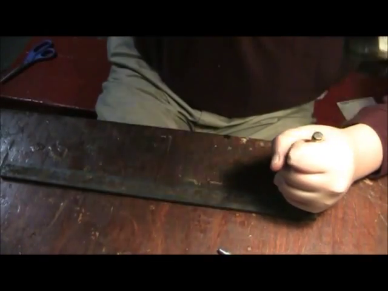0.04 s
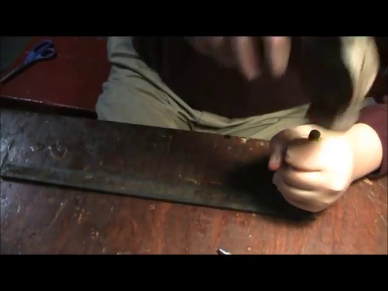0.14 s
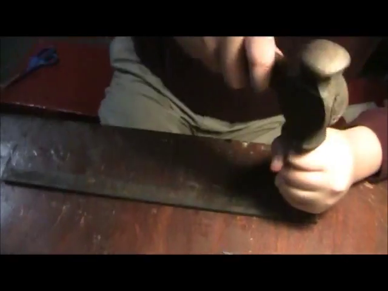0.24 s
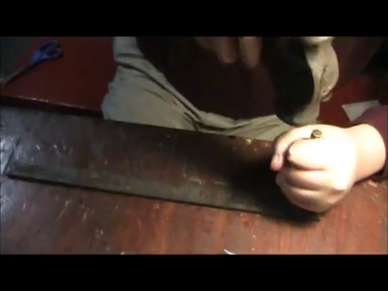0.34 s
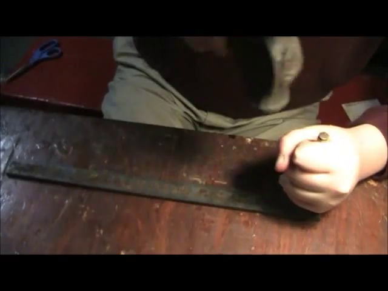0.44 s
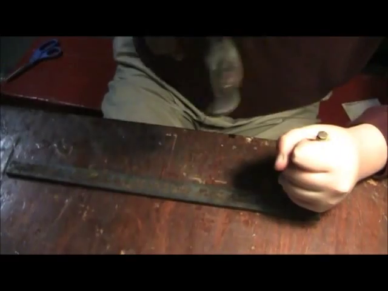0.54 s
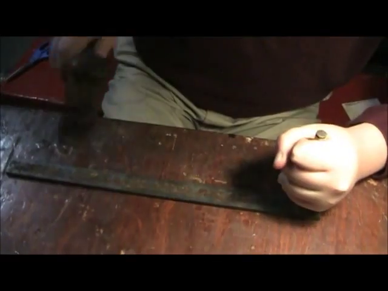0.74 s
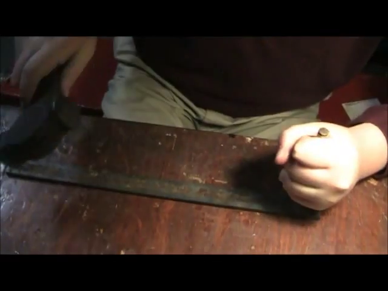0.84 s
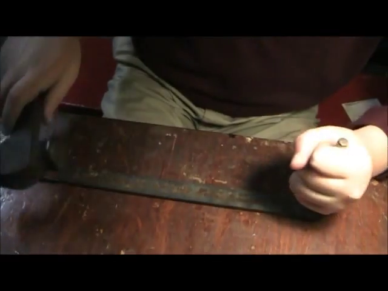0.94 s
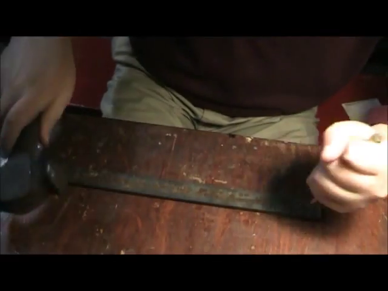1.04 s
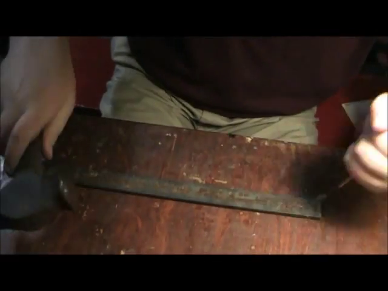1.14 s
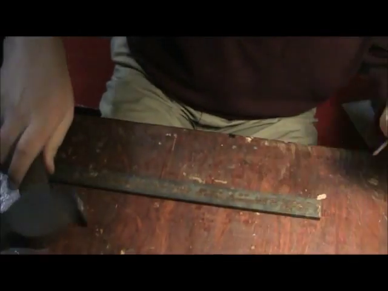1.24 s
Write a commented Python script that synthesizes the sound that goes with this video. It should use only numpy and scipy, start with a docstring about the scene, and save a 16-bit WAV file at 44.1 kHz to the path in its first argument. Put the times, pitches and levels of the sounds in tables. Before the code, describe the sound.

A single hammer blow on a steel punch lands at about 0.2 seconds, a clipped, bright crack with a woody bench thud and short room tail. Loose steel bounces sharply near 0.37 and 0.45, rattles to rest by 0.6, and leaves a high, thin ring fading after 1 second. From 0.7, sleeves and hands rustle, with soft wooden taps around 0.9 to 1.0. Low machine hum continues underneath.

```python
"""A small workshop: one hammer blow on a center punch over a steel bar, heard close, overloading the input.
Noise bursts make the tick, crack and bench shudder; damped sines make the bench thud.
A loose steel piece is tossed up, bounces (short noise chatters), rattles to rest (random grains)
and rings on (beating sines). Behind it: a humming machine (wavering sines), air (shaped noise),
sleeves and hands moving over the wood (patchy noise, small damped notes)."""
import sys
import numpy as np
from scipy import signal
from scipy.fft import rfft, irfft
from scipy.io import wavfile
from scipy.ndimage import uniform_filter1d

SR = 44100
rng = np.random.default_rng(int(sys.argv[2]) if len(sys.argv) > 2 else 0)


def nominal_scale(level):
    """Amplitude ratio for a level in decibels (scalar or array-like)."""
    x = np.asarray(level, float) / 20
    return 10 ** x


def unload_wav(signal):
    """Save mono or channel-first audio to the path in sys.argv[1] as 16-bit WAV at rate SR, clipped to [-1, 1]."""
    wavfile.write(
        sys.argv[1],
        SR,
        np.round(np.clip(np.atleast_2d(signal).T, -1, 1) * 32767).astype(np.int16),
    )


N = 57330  # length in samples


def evened(x):
    """Scales to unit rms."""
    return x / np.sqrt(np.mean(x ** 2) + 1e-20)


def read(points, hz):
    """Reads a spectral table along a log frequency axis."""
    f, value = np.transpose(points)
    return np.interp(np.log(hz + 1), np.log(f + 1), value)


def curve(points, t):
    """Reads a time curve with straight lines between its points."""
    return np.interp(t, *np.transpose(points))


def add(mix, s, sound):
    """Lays a sound into the mix from s seconds on, cut at the end of the mix."""
    part = mix[..., round(s * SR):][..., :sound.shape[-1]]
    part += sound[..., :part.shape[-1]]


def pan(db):
    """Left and right gains; positive dB leans left."""
    return nominal_scale(np.array([[db / 2], [-db / 2]]))


# Stereo width of the noises: f/Hz, left-right likeness (1 = identical)
LIKENESS = [(40, 0.88), (250, 0.96), (1000, 0.79), (3000, 0.45), (8000, 0.33), (15000, .1)]


def alike(a, b):
    """Two channels from two unrelated sounds, mixed as mid and side for the likeness of each band."""
    same = np.clip(read(LIKENESS, np.fft.rfftfreq(a.shape[-1], 1 / SR)), 0, 1)
    mid = rfft(a) * np.sqrt((1 + same) / 2)
    side = rfft(b) * np.sqrt((1 - same) / 2)
    return irfft(np.array([mid + side, mid - side]), a.shape[-1])


def hiss(size=N):
    """White noise in stereo."""
    return alike(*rng.standard_normal((2, size)))


def coloured(x, shape, taps_count=2048):
    """Causal minimum-phase filter of unit energy with the given spectral shape."""
    hz = abs(np.fft.fftfreq(2 * taps_count, 1 / SR))
    log_gain = np.log(nominal_scale(np.maximum(read(shape, hz), -90)))
    response = np.exp(np.conj(signal.hilbert(log_gain)))
    kernel = np.fft.ifft(response).real[:taps_count]
    kernel = kernel / np.linalg.norm(kernel)
    return signal.fftconvolve(x, kernel[None], axes=-1)[:, :x.shape[-1]]


# Decay of the room: f/Hz, t60/s
ROOM_DECAY = [(60, 0.5), (250, 0.87), (1000, 0.56), (3000, 0.53), (7000, 0.37), (14000, 0.076)]


def room(x):
    """Diffuse tail: noise with each band dying at its own speed, faded in over 12 ms."""
    hz, t, z = signal.stft(hiss(SR), SR, nperseg=256)
    decay = nominal_scale(-60 * t / read(ROOM_DECAY, hz)[:, None])
    tail = signal.istft(z * decay, SR, nperseg=256)[1]
    tail = tail * np.clip(np.arange(tail.shape[1]) / SR / 0.012, 0, 1)
    tail = tail / np.linalg.norm(tail[0])
    return signal.fftconvolve(x.mean(0)[None], tail, axes=1)[:, :N]


# Colour of the air noise: f/Hz, relative level/dB per Hz
AIR_COLOUR = [(25, -16), (60, -4.5), (180, -3.5), (400, -5), (700, -11.5), (1500, -17.5), (4000, -24.5),
              (8000, -35), (15400, -40.5)]
AIR_DB = -48


def air():
    """Steady shaped noise."""
    return nominal_scale(AIR_DB) * coloured(hiss(), AIR_COLOUR)


# Lines of the humming machine: f/Hz, level/dB before swell and pan
HUM_LINES = [(59.2, -62), (119, -57), (180, -50.5), (237, -53.5), (296, -57), (425, -53.5), (484.5, -54),
             (545, -53.5), (565.2, -47.5), (646, -56)]
# Slow swell of all the lines together: t/s, level/dB
HUM_SWELL = [(0, -3.5), (.2, -9), (.7, -4), (.95, 1.5), (1.3, -2)]
WAVER_BANDWIDTH_HZ = 3.6  # of each of the two equal poles that smooth the waver


def machine_hum():
    """Steady lines, each wavering in level and phase by its own slow complex noise."""
    t = np.arange(N) / SR
    pole = np.exp(-np.pi * WAVER_BANDWIDTH_HZ / SR)
    hum = np.zeros(N)
    for hz, db in HUM_LINES:
        slow = signal.lfilter([1], [1, -2 * pole, pole * pole], rng.standard_normal((2, 2 * N)))
        waver = evened(slow[:, N:])  # the filter has settled by then
        line = np.exp(2j * np.pi * (hz * t + rng.random()))
        hum += nominal_scale(db) * ((1 + 0.19 * (waver[0] + 1j * waver[1])) * line).real
    return np.sqrt(2) * hum * nominal_scale(curve(HUM_SWELL, t)) * pan(-3.2)


# Colour of the friction: f/Hz, relative level/dB per Hz
RUSTLE_COLOUR = [(100, -33), (300, -3), (700, -3.5), (1100, 1), (1600, -4.5), (3000, -5.5), (5400, -13.5),
                 (8000, -16.5), (15400, -32)]
# Movement: t/s, level/dB before treble lift and patches
RUSTLE_LEVEL = [(.3, -76), (.6, -72), (.72, -47), (.85, -47.5), (.93, -45.5), (1.05, -49), (1.15, -53),
                (1.3, -53)]
# Treble lift, none below 2.5 kHz and full from 10 kHz: t/s, level/dB
RUSTLE_TREBLE = [(.3, -2), (.7, -15), (.85, -1.5), (1., -0.5), (1.12, -1), (1.3, 12.5)]


def rustle():
    """Patchy friction noise of sleeves and hands, with level and treble moving over time."""
    hz, t, z = signal.stft(coloured(hiss(), RUSTLE_COLOUR), SR, nperseg=512)
    patches = uniform_filter1d(rng.standard_normal(z.shape[1:]), 6, axis=0)  # bins wide
    patches = evened(uniform_filter1d(patches, 8, axis=1))  # frames long
    lift = np.clip(np.log2(hz[:, None] / 2500 + 1e-3), 0, 2) / 2
    gain_db = curve(RUSTLE_LEVEL, t) + lift * curve(RUSTLE_TREBLE, t) + 2.5 * patches
    return signal.istft(z * nominal_scale(gain_db), SR, nperseg=512)[1][:, :N]


# Small sounds of the hands and the hammer on the wood: t/s, level/dB before pan, f/Hz, t60/s
TAPS = [(.727, -47, 3000, 0.016), (.909, -24.5, 4100, 0.0038), (.909, -27.5, 3000, 0.0035),
        (.928, -29, 1114, 0.059), (.928, -21.5, 585, 0.019), (1.001, -31, 572, 0.017),
        (1.25, -52.5, 2225, 0.49)]
TAP_RISE_CYCLES = 1.8  # time constant of the onset


def taps():
    """Each a single damped note of the wood with a soft onset."""
    t, out = np.arange(SR) / SR, np.zeros(N)
    for s, db, hz, t60 in TAPS:
        rise = 1 - np.exp(-t * hz / TAP_RISE_CYCLES)
        add(out, s, nominal_scale(db - 60 * t / t60) * rise * np.sin(2 * np.pi * hz * t))
    return out * pan(1.0)


PIECE_PAN_DB = -3
# Grain level of the rattle: t/s, level/dB before pan; silent outside the first and last time
RATTLE_LEVEL = [(.38, -25.5), (.44, -33.5), (.46, -28.5), (.49, -32), (.52, -28), (.57, -41.5), (.68, -63)]
# Colour of the rattle: f/Hz, relative level/dB per Hz
RATTLE_COLOUR = [(150, -22), (400, -9.5), (1200, -2), (3000, -0.5), (5000, -4), (7000, -9), (11000, -30.5),
                 (15000, -47)]
GRAINS_PER_S = 3500  # mean rate in each of the two grain streams


def rattle():
    """The loose piece rattles to rest: dense random impacts of random size and sign."""
    t = np.arange(N) / SR
    draw, size, sign = rng.random((3, 2, N))
    size_db = 3 * np.minimum(-np.log(size + 1e-6), 3)
    grains = evened((draw < GRAINS_PER_S / SR) * nominal_scale(size_db) * np.sign(sign - 0.5))
    moving = (t > RATTLE_LEVEL[0][0]) * (t < RATTLE_LEVEL[-1][0])
    dry_rattle = alike(*grains) * nominal_scale(curve(RATTLE_LEVEL, t)) * moving
    return coloured(dry_rattle, RATTLE_COLOUR) * pan(PIECE_PAN_DB)


# Contacts of the loose piece with the bench: t/s, level/dB before colour and pan, time to fall 20 dB/s
BOUNCES = [(0.268, -18.5, 0.0094), (0.3726, -16, 0.0054), (.3762, -8, 0.0093), (0.3985, -32, 0.019),
           (0.436, -23.5, 0.0072), (0.4488, -6.5, 0.0055), (.4508, -10.5, 0.0084), (0.486, -25.5, 0.005),
           (.4977, -14.5, 0.0034), (0.5006, -14.5, .012)]
# Colour of the knocks: f/Hz, relative level/dB per Hz
KNOCK_COLOUR = [(120, -25), (200, -11.5), (1480, -5.5), (2950, -1.5), (5570, -8), (6680, -3.5),
                (8310, -13.5), (9970, -12), (13100, -34), (14300, -39.5), (15400, -80)]


def bounces():
    """Each contact is a short noise chatter that knocks the wood."""
    chatter_samples = 2048
    t, chatters = np.arange(chatter_samples) / SR, np.zeros((2, N))
    for s, db, length in BOUNCES:
        add(chatters, s, hiss(chatter_samples) * nominal_scale(db - 20 * t / length))
    return coloured(chatters, KNOCK_COLOUR) * pan(PIECE_PAN_DB)


def rung(modes, t):
    """Sum of damped sines; close neighbours beat."""
    return sum(sign * nominal_scale(db - 60 * t / t60) * np.sin(2 * np.pi * hz * t) for hz, db, t60, sign in modes)


def restruck(blows, sound):
    """Each blow replaces what was left of the one before."""
    out = np.zeros(N)
    for s, db in blows:
        start = round(s * SR)
        out[start:] = nominal_scale(db) * sound[:N - start]
    return out


# Two mode families of the loose steel: f/Hz, relative level/dB, t60/s, polarity
LOW_RING = [(5662.5, 0, .66, 1), (5655.6, -18, 2.6, 1), (5665.7, -17.5, 2.6, 1)]
HIGH_RING = [(10760.5, 0, .5, 1), (10750.5, -8, .6, 1)]
# Contacts that stop a family and set it ringing afresh: t/s, level/dB before pan
LOW_STRUCK = [(.3762, -34), (.4482, -22)]
HIGH_STRUCK = [(.2685, -47), (.3762, -43), (.4482, -41), (.5005, -42)]
LOW_RISE_S, RING_PAN_DB = 0.05, -4.5
DAMPED_S, DAMPING_DB_PER_S = 1.04, 85  # the steel is touched and dies faster


def steel_ring():
    """The loose steel rings in two mode families; the low one swells in after each contact."""
    t = np.arange(N) / SR
    low = rung(LOW_RING, t) * (1 - np.exp(-(t / LOW_RISE_S) ** 2))
    high = rung(HIGH_RING, t)
    ring = restruck(LOW_STRUCK, low) + restruck(HIGH_STRUCK, high)
    damping = nominal_scale(-DAMPING_DB_PER_S * np.maximum(t - DAMPED_S, 0))
    return ring * damping * pan(RING_PAN_DB)


# Hard faces meet, colour of the tick: f/Hz, relative level/dB per Hz
TICK_COLOUR = [(2000, -24), (5000, -10.5), (7800, 9.5), (10000, -7.5), (14000, -8), (16500, -30)]
TICK_DB, TICK_T60_S = 7, 0.021  # level before colour and pan


def tick(t):
    """Very short bright noise of steel faces meeting."""
    return coloured(hiss(len(t)) * nominal_scale(TICK_DB - 60 * t / TICK_T60_S), TICK_COLOUR)


# Colour of the crack: f/Hz, relative level/dB per Hz
CRACK_COLOUR = [(40, -43), (90, -6.5), (300, 0.5), (1300, -1.5), (2500, -1.5), (5300, -12), (9500, -20),
                (15400, -34)]
CRACK_T60_S = 0.042


def crack(t):
    """Broad decaying noise of steel on steel."""
    return coloured(hiss(len(t)) * nominal_scale(-60 * t / CRACK_T60_S), CRACK_COLOUR)


# Bench top and what lies on it, shaking: f/Hz, relative level/dB per Hz
SHUDDER_COLOUR = [(24, -29), (40, -11), (103, -9), (259, -4.5), (406, -3.5), (448, -16.5), (483, -11),
                  (1250, -10.5), (2700, -10), (15400, -41)]
SHUDDER_UNDER_CRACK_DB, SHUDDER_T60_S = -23, 0.39  # level of the noise before lumps and colour


def shudder(t):
    """Longer noise made rough by random lumps in its level."""
    lumps = nominal_scale(3.7 * evened(uniform_filter1d(rng.standard_normal(len(t)), 150)))
    decay = nominal_scale(SHUDDER_UNDER_CRACK_DB - 60 * t / SHUDDER_T60_S)
    return coloured(hiss(len(t)) * lumps * decay, SHUDDER_COLOUR)


# Modes of the bench: f/Hz, relative level/dB, t60/s
BENCH_MODES = [(108.1, 0.5, 0.22), (175.5, -15, 0.42), (283, 1.5, .12), (400.6, -15, 0.25),
               (538.3, -5.5, 0.14), (669, -5, 0.107), (854.3, 2.5, 0.066), (1060, -12, 0.12),
               (1194, 1, 0.086), (1815, -10, 0.1), (2070, -23, 0.043), (2140, -17, 0.064),
               (2660, -20, 0.035)]
BENCH_DB, THUD_RISE_CYCLES = -6.5, 0.77  # gain of all modes; time constant of the onset


def bench_thud(t):
    """Damped modes of the bench, each with a soft onset."""
    thud = np.zeros(len(t))
    for hz, db, t60 in BENCH_MODES:
        rise = 1 - np.exp(-t * hz / THUD_RISE_CYCLES)
        thud += nominal_scale(db - 60 * t / t60) * rise * np.sin(2 * np.pi * hz * t)
    return nominal_scale(BENCH_DB) * thud


BLOW_S, BENCH_PAN_DB = 0.2116, -1.3
BLOW_DB = 12.5  # gain of crack and shudder


def blow():
    """The hammer blow: tick and crack of steel on steel, bench modes and a rough shudder."""
    t, out = np.arange(SR) / SR, np.zeros((2, N))
    add(out, BLOW_S, nominal_scale(BLOW_DB) * (crack(t) + shudder(t)) + tick(t) + bench_thud(t))
    return out * pan(BENCH_PAN_DB)


BLOW_ROOM_DB, PIECE_ROOM_DB = -19.5, -9  # sends to the room


def scene():
    """Everything together; the blow, knocks, rattle and taps also feed the room."""
    hit, small = blow(), taps()
    knocks = bounces() + rattle()
    wet = room(nominal_scale(BLOW_ROOM_DB) * hit + nominal_scale(PIECE_ROOM_DB) * (knocks + small))
    background = air() + machine_hum() + rustle()
    return hit + knocks + steel_ring() + small + wet + background


def band_limit(x):
    """A steep low-pass at the top of the band."""
    return signal.sosfilt(signal.butter(12, 15570, fs=SR, output="sos"), x)


KNEE = 12  # higher = harder bend into saturation
EDGE_HZ = 15600


def record(dry):
    """The input saturates at full scale, then a low-pass limits the band."""
    clipped = dry / (1 + abs(dry) ** KNEE) ** (1 / KNEE)
    lowpass = signal.firwin(255, EDGE_HZ, window=("kaiser", 3), fs=SR)
    limited = signal.oaconvolve(clipped, lowpass[None], "same")
    return band_limit(np.clip(limited, -1, 1))


dry = scene()
out = record(dry)
unload_wav(out)
```